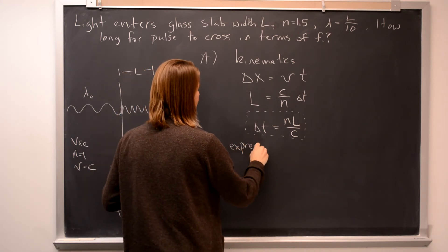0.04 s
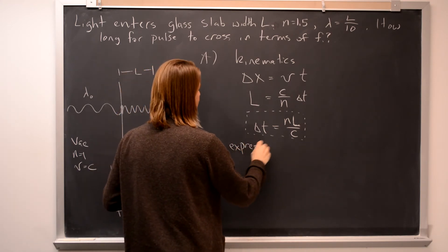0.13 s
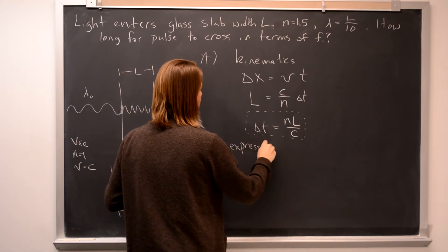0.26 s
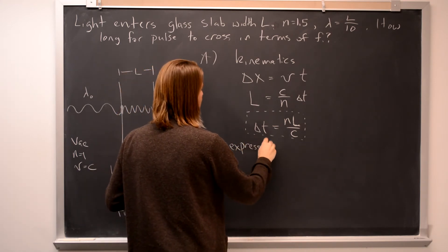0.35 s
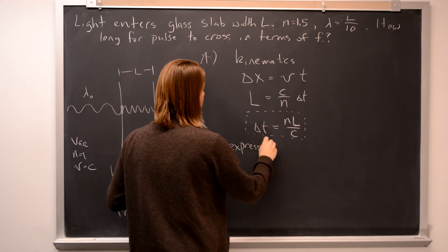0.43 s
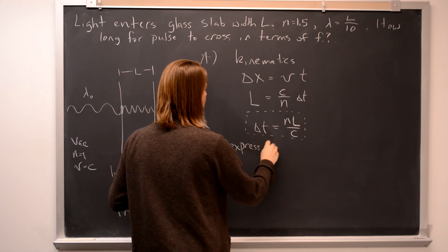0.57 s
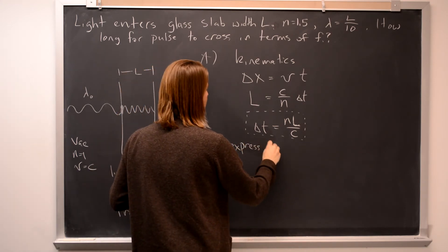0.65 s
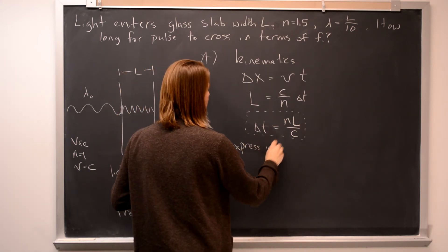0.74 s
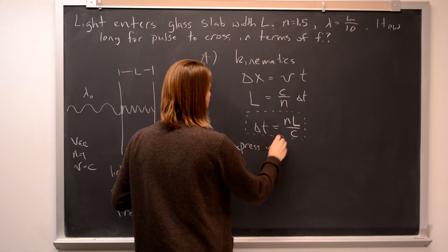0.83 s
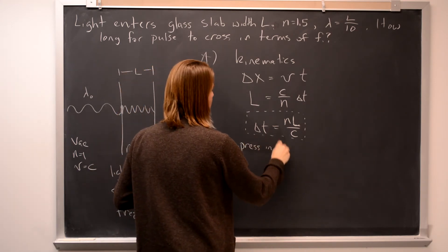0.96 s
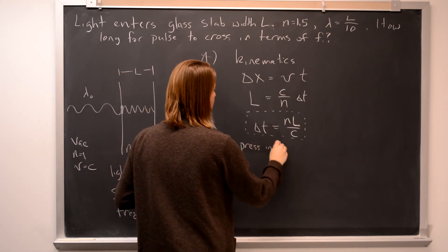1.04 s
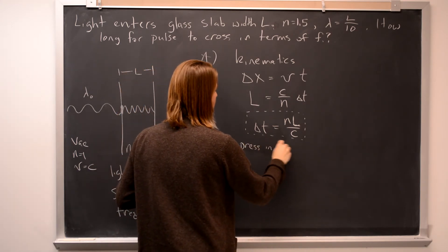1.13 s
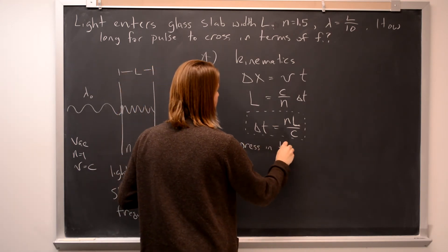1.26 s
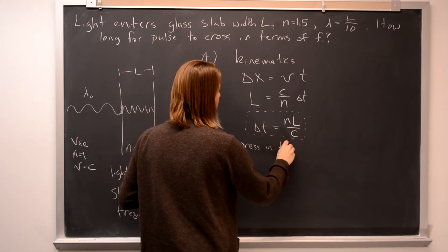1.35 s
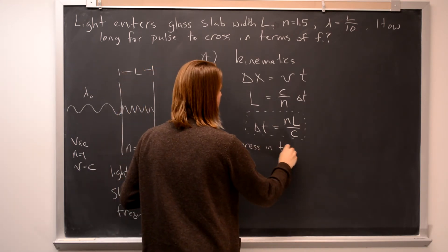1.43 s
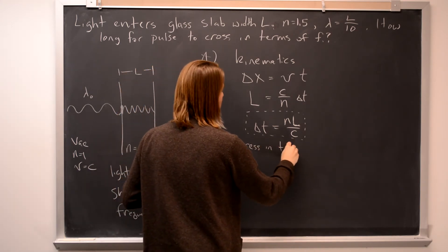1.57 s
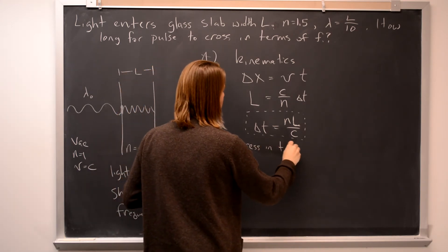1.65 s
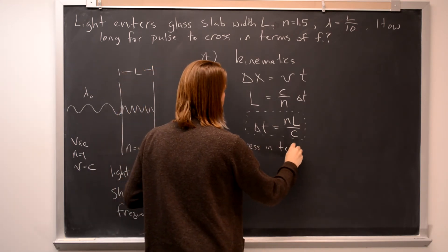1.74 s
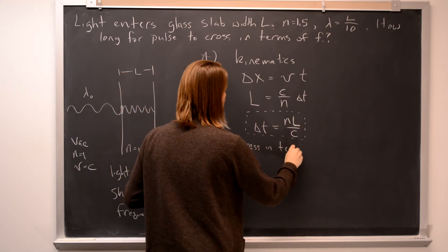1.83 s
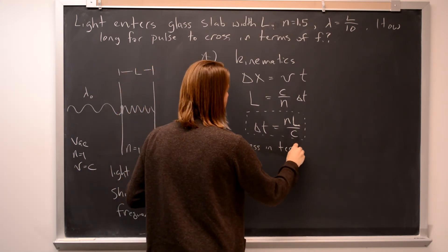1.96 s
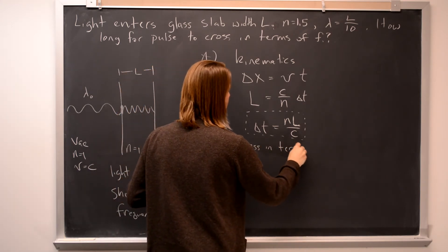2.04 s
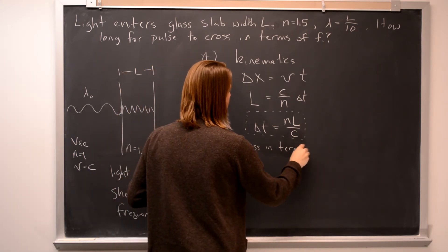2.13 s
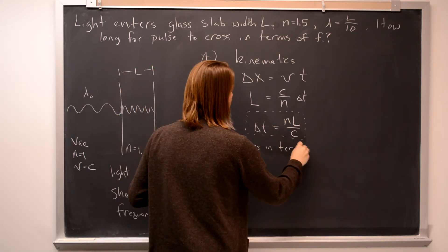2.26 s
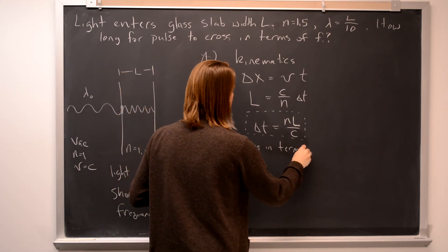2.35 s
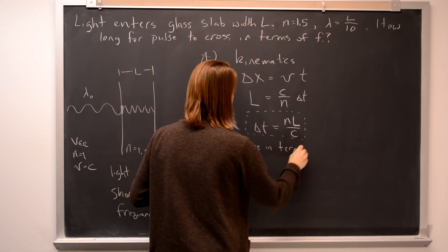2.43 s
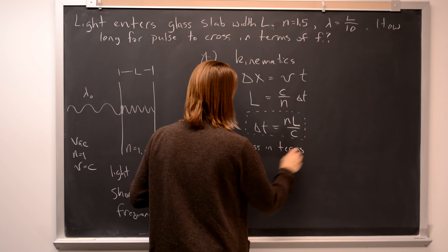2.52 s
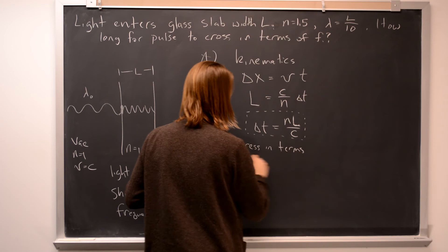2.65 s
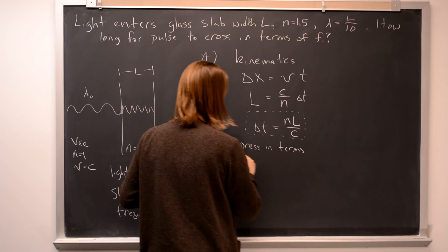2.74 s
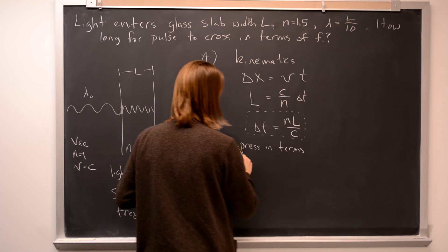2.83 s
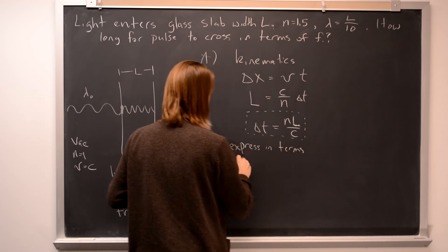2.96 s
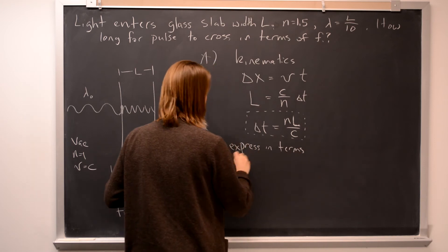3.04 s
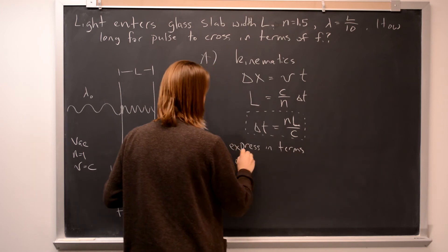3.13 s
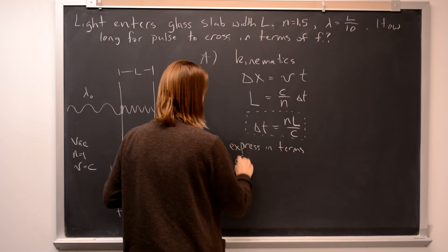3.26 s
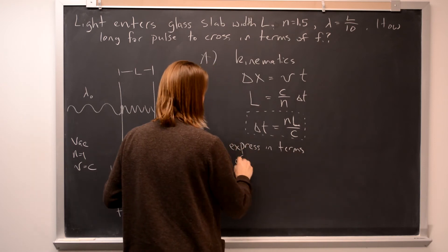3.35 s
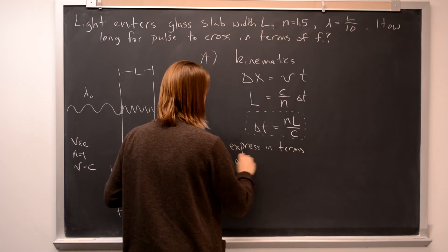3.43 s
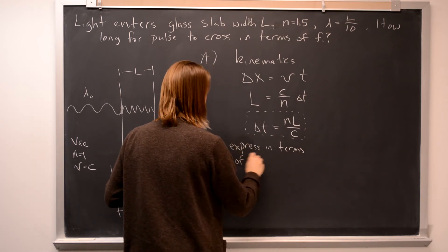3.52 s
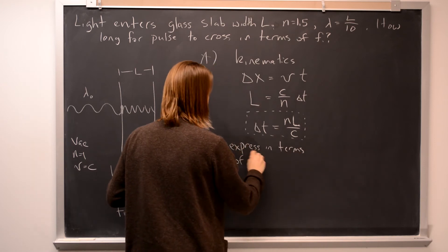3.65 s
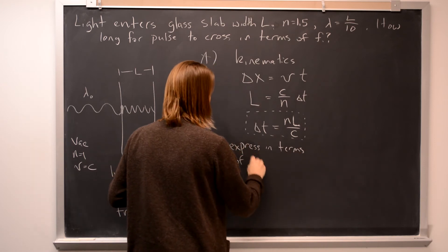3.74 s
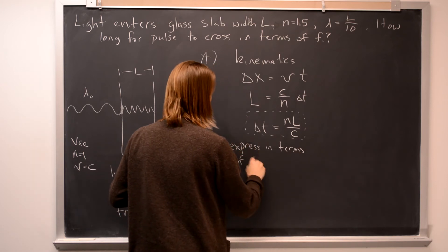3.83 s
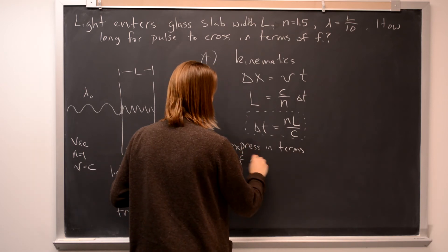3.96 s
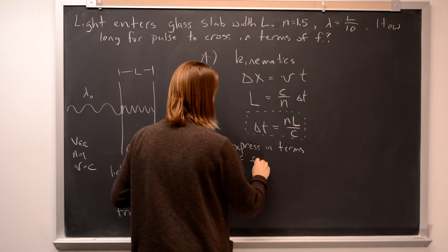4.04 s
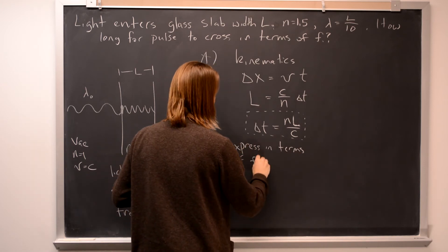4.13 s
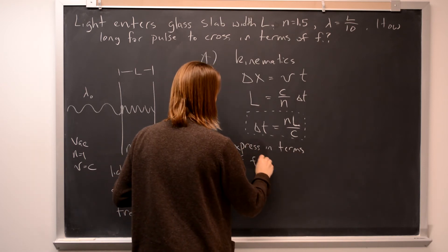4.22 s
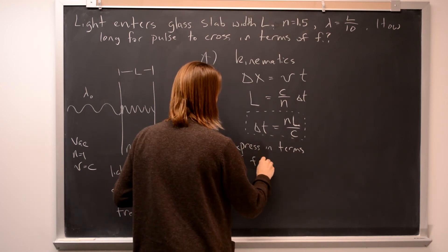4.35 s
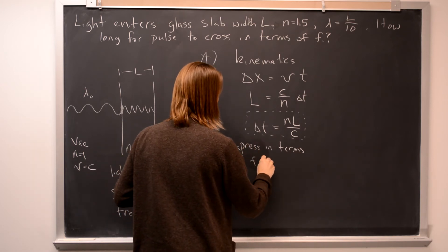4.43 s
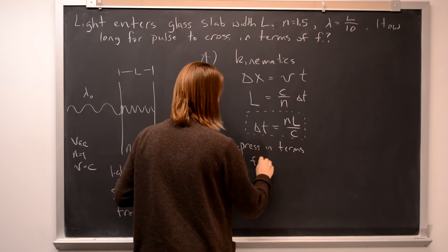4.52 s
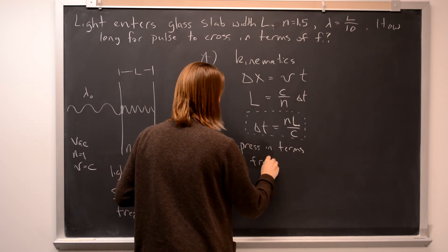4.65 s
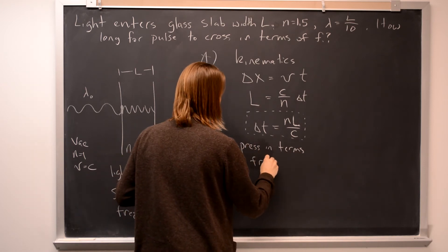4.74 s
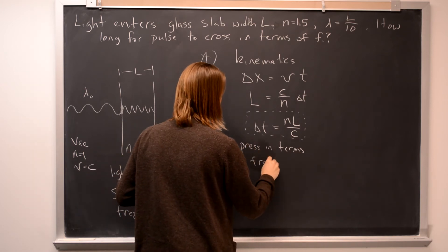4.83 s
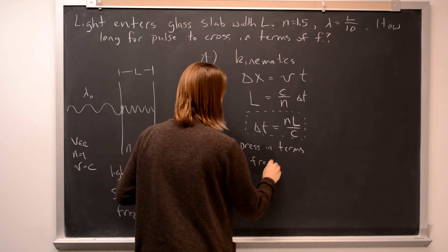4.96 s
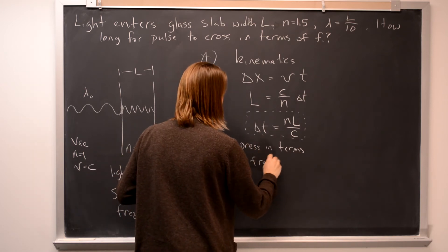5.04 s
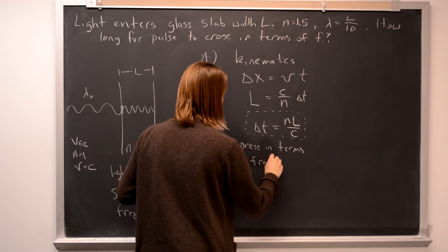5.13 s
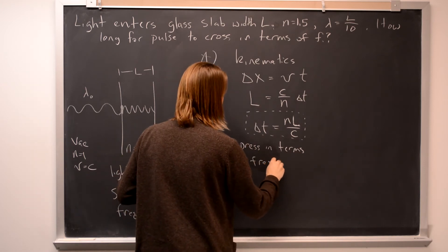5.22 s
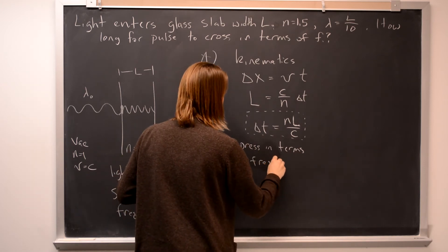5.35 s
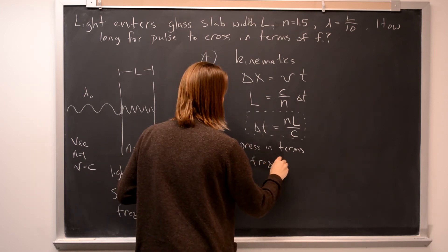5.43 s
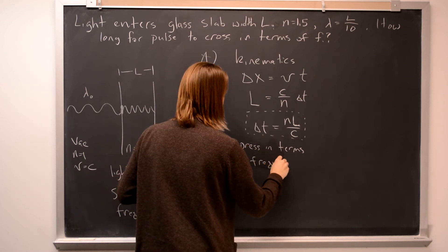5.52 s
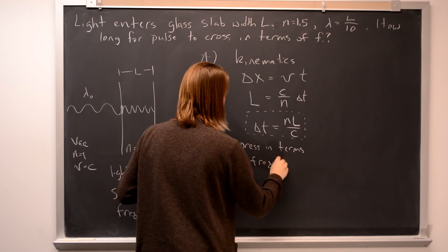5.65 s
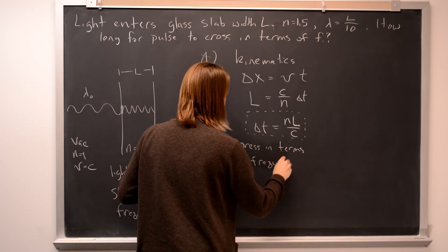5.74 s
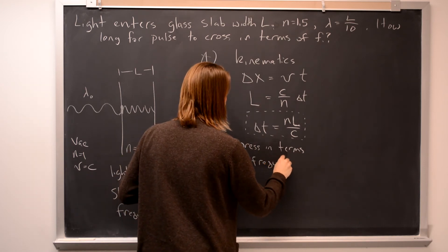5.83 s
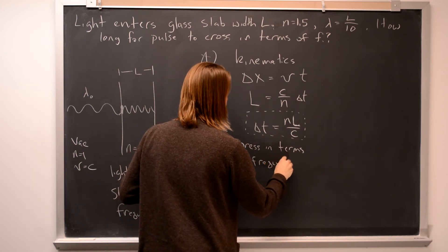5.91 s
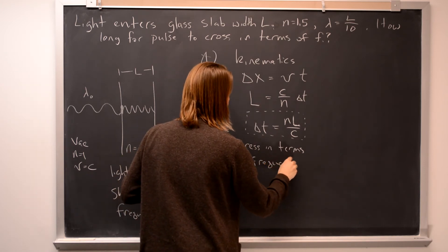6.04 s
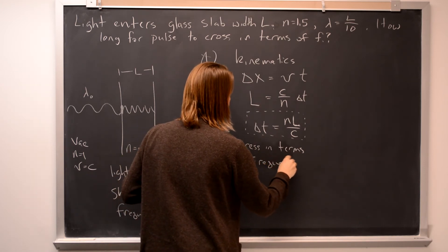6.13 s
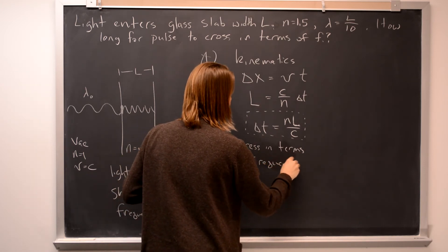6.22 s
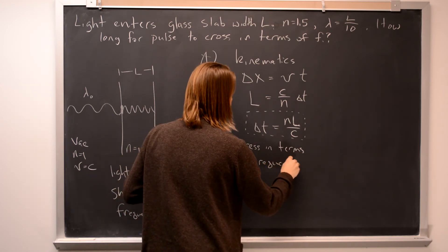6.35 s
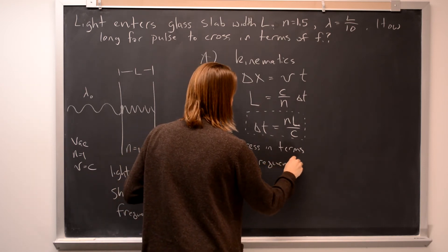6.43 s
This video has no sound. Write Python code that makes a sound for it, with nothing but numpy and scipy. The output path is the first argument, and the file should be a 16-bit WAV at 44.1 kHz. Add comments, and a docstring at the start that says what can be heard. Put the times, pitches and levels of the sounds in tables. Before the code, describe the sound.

A few metres from a stereo microphone, chalk strikes a wall blackboard in irregular handwriting rhythm. Each sharp knock rings briefly through the board and fades in a short classroom reverb. Strong taps come first, gaps and gentler touches follow, then duller, lower knocks and a final brisk group. The sliding between them is faint, with one tiny high squeak late. Steady soft air and hum lie underneath, with dull, nearly hidden thuds.

```python
"""Chalk writes on a wall blackboard in a small, quiet classroom, a few metres from a stereo microphone.
Each stroke starts with a hard tap: an impulse that excites the board's resonances, early echoes and room.
The chalk then slides faintly, as filtered friction noise, and squeaks twice, as gliding stick-slip tones.
Soft low thuds are short pressure pulses, each with a faint rustle of filtered noise just ahead.
Ventilation is shaped steady noise with a slightly wavering hum of sines."""
import sys
import numpy as np
from scipy import signal
from scipy.fft import rfft, irfft
from scipy.io import wavfile

SR = 44100
rng = np.random.default_rng(int(sys.argv[2]) if len(sys.argv) > 2 else 0)


def persist_wave(psi):
    """Save psi, clipped to +-1, as 16-bit WAV."""
    counts = np.round(np.clip(psi, -1, 1) * 32767).astype(np.int16)
    wavfile.write(sys.argv[1], SR, np.atleast_2d(counts).T)


N = 285856
TIME = np.arange(N) / SR
# samples in each short sound and room response, and their times in seconds
LENGTH = 16384
SHORT_TIME = np.arange(LENGTH) / SR
# signs of a difference between the left and right channels
LEFT_RIGHT = np.array([[1], [-1]])

# chalk landings: (time [s], relative level [dB], contact hardness [dB], board resonance at that spot [Hz])
LANDINGS = [(0.1982, -8, 0.5, 1754), (0.3424, -11.5, 5.5, 1975), (0.4768, -5.5, 2.5, 1790),
            (.869, -7.5, 4, 1640), (1.0676, -5.5, 5, 1234), (1.2289, -8, 0.5, 1603),
            (1.466, -13.5, 0, 1598), (1.6985, -19, -3, 1430), (2.185, -8, 5.5, 1774),
            (2.8362, -17, -5.5, 1617), (3.1342, -15, -7.5, 1558), (3.3717, -11, 4, 1586),
            (3.595, -10, 0, 1480), (3.8168, -16, -5.5, 873), (4.0188, -8.5, -1, 1060),
            (4.3094, -15, -6, 1041), (4.6491, -16.5, -5.5, 1060), (5.124, -7, 3.5, 1150),
            (5.249, -27.5, -5.5, 950), (5.4821, -8.5, -4, 1175), (5.7823, -6.5, 1, 1164),
            (6.1022, -8.5, 6.5, 1200), (6.2812, -10.5, 2.5, 1167)]
# broad colour of the board under an average tap: (frequency [Hz], relative level [dB])
BOARD_COLOUR = [(100, -28.5), (320, -28), (450, -16), (750, -10.5), (1100, -2), (1550, -1.5), (1900, -9),
                (2700, -3.5), (4000, -15.5), (4900, -22), (6800, -26), (10000, -41), (16000, -69)]
# soft low thuds: (time [s], relative level [dB])
THUD_EVENTS = [(.549, -39.5), (1.049, -41), (1.571, -40.5), (2.06, -43.5), (3.033, -47.5), (3.548, -40.5),
               (4.052, -37.5), (4.574, -43.5), (5.065, -42), (6.052, -42)]


def undb(db):
    """Amplitude ratio: 20 dB is a factor of ten."""
    return 10 ** (np.asarray(db) / 20)


def unit(x):
    """Normalisation to a root-mean-square value of 1."""
    return x / np.sqrt(np.mean(x ** 2))


def curve(points, hz):
    """Linear interpolation of (frequency [Hz], value) points on a logarithmic frequency axis."""
    f, value = np.transpose(points)
    return np.interp(np.log(hz + 1), np.log(f), value)


def bins(size):
    """Frequencies in Hz of a discrete Fourier spectrum."""
    return np.fft.rfftfreq(size, 1 / SR)


def resonance(hz, centre_hz, width_hz):
    """Lorentzian resonance peak of height 1, with its full width at half height."""
    return 1 / (1 + (2 * (hz - centre_hz) / width_hz) ** 2)


def causal(db):
    """Minimum-phase response with the given gain: it rings after a blow, never before."""
    cepstrum = irfft(np.log(undb(db)))
    half = len(cepstrum) // 2
    # folding the cepstrum onto positive times makes the response causal
    folded = np.r_[cepstrum[0], 2 * cepstrum[1:half], np.zeros(half)]
    return np.exp(rfft(folded))


def add(out, start_s, sound):
    """Superposition: a sound is summed into the mix from its start time."""
    i = max(int(start_s * SR), 0)
    out[:, i:i + sound.shape[1]] += sound[:, :N - i]


def taps(gain_db=19, room_db=2.5, spot_db=4.0, near_db=5, spot_width_hz=440, shared=0.38):
    """Impulse excitation: each landing rings the board's modes, most at the resonance of the struck spot."""
    # modes of the board: (frequency [Hz], width [Hz], height [dB])
    board_modes = [(675, 37, 4.5), (772, 19, 4), (963, 12, 5.5), (1168, 90, 4.5), (1326, 52, 6),
                   (1641, 91, -3), (1652, 94, 7), (2020, 126, 5), (2400, 25, -0.5), (2474, 35, 2),
                   (2720, 53, 1), (2850, 68, 3), (3140, 50, 3.5), (3590, 54, 0.5), (4100, 77, 6.5)]
    out, hz = np.zeros((2, N)), bins(LENGTH)
    board_db = curve(BOARD_COLOUR, hz)
    for mode_hz, width_hz, height_db in board_modes:
        board_db = board_db + height_db * resonance(hz, mode_hz, width_hz)
    common_field = diffuse(LENGTH)
    for start_s, level_db, hardness_db, spot_hz in LANDINGS:
        spot = resonance(hz, spot_hz, spot_width_hz)
        contact_db = touch(hz, level_db, hardness_db, spot_hz)
        ring = causal(board_db + contact_db + spot_db * spot)
        # the struck spot speaks first, before the blow spreads through the whole board
        first = irfft(ring * causal(near_db * spot) * arrivals())
        # all spots share part of their echo pattern
        field = np.sqrt(shared) * common_field + np.sqrt(1 - shared) * diffuse(LENGTH)
        room = irfft(ring * rfft(reverberation(field)))
        knock = unit(first) + undb(room_db) * unit(room)
        add(out, start_s, undb(level_db + gain_db) * knock / np.sqrt(LENGTH))
    return out


def touch(hz, level_db, hardness_db, spot_hz):
    """Contact stiffness sets the colour: a hard contact clacks, and a hard or strong one ticks."""
    # relative to an average landing at -11 dB and 1390 Hz
    # spots that resonate higher also give more low body: 6 dB per octave
    body_db = 6 * np.log2(spot_hz / 1390)
    tick_db = .75 * (level_db + 11) + 1.33 * hardness_db
    return curve([(600, body_db), (1300, 0), (2700, hardness_db), (6000, tick_db)], hz)


def arrivals(jitter_s=.00016, scatter_db=3.06, channel_lag_s=.000011, treble_hz=5500,
             crush_db=-3, crush_s=0.001):
    """Multipath propagation: delayed copies interfere, and their paths shift as the hand moves."""
    # first arrivals, past the writer and off nearby surfaces:
    # (mean delay [s], mean level [dB], added treble [dB])
    paths = [(.0004, -7.5, 5), (.0019, -5.5, 6.5), (.0044, 2, 10), (.0055, -6, 31), (.0075, -11, 11),
             (0.0093, -12.5, 15), (0.0222, -11.5, -16)]
    hz, total = bins(LENGTH), 0
    treble = hz ** 2 / (hz ** 2 + treble_hz ** 2)
    shifts = rng.standard_normal((len(paths), 3))
    for (delay_s, level_db, treble_db), (late, size, angle) in zip(paths, shifts):
        lag_s = max(delay_s + jitter_s * late, 0) + channel_lag_s * angle * LEFT_RIGHT
        gain = undb(level_db + scatter_db * size + treble_db * treble)
        total = total + gain * np.exp(-2j * np.pi * hz * lag_s)
    # the tip crumbles for a moment as it lands, which smears the treble
    crumbs = rng.standard_normal(LENGTH) * np.exp(-SHORT_TIME / crush_s)
    crumbs = unit(crumbs) / np.sqrt(LENGTH)
    return total * (1 - treble + undb(crush_db) * treble * rfft(crumbs))


def slides(graze_db=-52, graze_s=0.008, slide_db=-39, slide_s=0.11):
    """Contact noise: the tip grazes the board around each landing and slides after it; short scrapes join in."""
    # short scrapes, and at 5.262 s the soft noise of a second light tap:
    # (time [s], length [s], direct level [dB], centre frequency [Hz])
    short_noises = [(0.0, 0.0073, -46.5, 1450), (3.49, 0.011, -61.5, 1410), (3.885, 0.025, -50, 1050),
                    (5.262, .018, -36, 967)]
    out = np.zeros((1, N))
    noises = list(short_noises)
    for start_s, level_db, _, spot_hz in LANDINGS:
        noises.append((start_s - graze_s, 2 * graze_s, graze_db, spot_hz))
        # the slide's level is relative to its tap's
        noises.append((start_s, slide_s, level_db + slide_db, spot_hz))
    for start_s, length_s, level_db, centre_hz in noises:
        arch = np.sin(np.pi * np.minimum(SHORT_TIME / length_s, 1))
        pressure = np.sqrt(np.clip(arch, 0, 1))
        add(out, start_s, undb(level_db) * friction(pressure, centre_hz)[None])
    return out


def friction(pressure, centre_hz, width_hz=550, grain_db=4, focus_db=15, soft_hz=3200):
    """Random excitation: chalk crumbling under a soft push gives dense uneven grains that ring the board."""
    hz = bins(LENGTH)
    unevenness = undb(grain_db * rng.standard_normal(LENGTH))
    grains = pressure * rng.standard_normal(LENGTH) * unevenness
    board = causal(curve(BOARD_COLOUR, hz) + focus_db * resonance(hz, centre_hz, width_hz))
    # the soft push is a first-order low-pass
    scrape = irfft(rfft(grains) * board / (1 + 1j * hz / soft_hz))
    return unit(scrape) * np.sqrt(np.mean(pressure ** 2))


def squeaks(overtone_db=-38, tone_attack=.5, rasp_attack=.25):
    """Stick-slip oscillation: a tone swells, glides and lets go; it rasps as the tip catches."""
    # squeaks: (time [s], length [s], direct level [dB], starting pitch [Hz], glide [Hz/s],
    # rasp relative to the tone [dB])
    squeak_events = [(2.952, .036, -40, 1780, -10000, -3.5), (5.849, .023, -13, 2222, 2800.5, -33.5)]
    out = np.zeros((1, N))
    for start_s, length_s, level_db, pitch_hz, glide, rasp_db in squeak_events:
        pitch = pitch_hz + glide * np.minimum(SHORT_TIME, length_s)
        phase = 2 * np.pi * np.cumsum(pitch) / SR
        # each attack is a share of the squeak's length
        progress = SHORT_TIME / length_s
        swell = np.interp(progress, [0, tone_attack, 1], [0, 1, 0])
        catch = np.interp(progress, [0, rasp_attack, 1], [0, 1, 0]) ** 2
        tone = swell * (np.sin(phase) + undb(overtone_db) * np.sin(2 * phase))
        rasp = undb(rasp_db) * friction(catch, pitch_hz)
        add(out, start_s, undb(level_db) * (tone + rasp)[None])
    return out


def diffuse(size):
    """Diffuse field: the spectrum of white noise that reaches the microphone from all sides."""
    # side against mid: (frequency [Hz], level difference [dB])
    side_levels = [(40, -11), (150, -7), (500, -7), (1100, -8.5), (3000, -6.5), (8000, -3), (14000, -3.5)]
    mid, side = rfft(rng.standard_normal((2, size)))
    width = undb(curve(side_levels, bins(size)))
    return (mid + width * side * LEFT_RIGHT) / np.sqrt(1 + width ** 2)


def reverberation(field, build_s=0.0051):
    """Exponential decay: each band of a diffuse field dies at its own rate, in a response of unit energy."""
    # decay of board and room: (frequency [Hz], time to fall by 60 dB [s])
    decays = [(200, 0.33), (550, 0.27), (1100, 0.25), (1450, 0.26), (2000, 0.24), (2600, 0.25),
              (3100, 0.25), (3800, .23), (5500, 0.22), (10000, 0.13)]
    hz = bins(LENGTH)
    centres, t60s = np.transpose(decays)
    tail = 0
    for share, t60 in zip(np.eye(len(decays)), t60s):
        band = irfft(field * curve(np.c_[centres, share], hz))
        tail = tail + band * np.exp(-np.log(1000) * SHORT_TIME / t60)
    build_up = 1 - np.exp(-SHORT_TIME / build_s)
    return unit(tail * build_up) / np.sqrt(LENGTH)


def in_room(x, wet_db):
    """Convolution with the room response adds the classroom's reverberation to a sound."""
    response = reverberation(diffuse(LENGTH), build_s=0.0035)
    wet = signal.fftconvolve(x, response, axes=1)[:, :N]
    return x + undb(wet_db) * np.std(x) * unit(wet)


def thuds(width_s=0.0054, lead_s=0.0297, lead_db=-3):
    """Pressure pulses: each thud is a dull dip of pressure followed by a push."""
    def bump(centre_s):
        u = (TIME - centre_s) / width_s
        return np.exp(-u ** 2) - np.exp(-(u / 4) ** 2) / 4

    out = np.zeros(N)
    for push_s, level_db in THUD_EVENTS:
        dip = undb(lead_db) * bump(push_s - lead_s)
        out += undb(level_db) * (bump(push_s) - dip)
    return out


def rustles(rustle_db=-65, ahead_s=0.032, length_s=.014, centre_hz=1320):
    """Gated friction noise: a faint rustle comes just ahead of each thud."""
    out = np.zeros((1, N))
    pressure = 1. * (SHORT_TIME < length_s)
    for thud_s, _ in THUD_EVENTS:
        add(out, thud_s - ahead_s, undb(rustle_db) * friction(pressure, centre_hz)[None])
    return out


def ventilation(air_db=-55.5, waver_rad=.6):
    """Broadband flow noise with a tonal hum whose phases drift slowly at random."""
    # spectrum of ventilation and hiss: (frequency [Hz], relative density [dB per Hz])
    air_colour = [(15, -57.5), (25, -17.5), (108, -4.5), (161, -7), (206, -6.5), (242, -3), (270, -8.5),
                  (309, -9.5), (476, -15), (714, -15), (1160, -19), (4870, -23.5), (11300, -23.5),
                  (16000, -25)]
    # hum partials: (frequency [Hz], rms level [dB])
    hum_partials = [(60, -70), (120.5, -68.5), (239, -83)]
    air = irfft(diffuse(N) * undb(curve(air_colour, bins(N))), N)
    air = unit(air) * undb(air_db)
    knots = np.linspace(0, TIME[-1], 20)
    hum = 0
    for hz, level_db in hum_partials:
        drift = waver_rad * np.interp(TIME, knots, rng.standard_normal(len(knots)))
        hum = hum + undb(level_db) * np.sqrt(2) * np.sin(2 * np.pi * hz * TIME + drift)
    return air + hum


def scene(left_db=1.0, wet_db=-3):
    """Superposition of the writing and the background, a touch left of centre, with central thuds."""
    faint = slides() + squeaks() + rustles()
    chalk = taps() + in_room(faint, wet_db)
    balance = undb(left_db * LEFT_RIGHT / 2)
    return (chalk + ventilation()) * balance + thuds()


def record(dry):
    """Saturation and band-limiting: the recorder rounds the highest peaks and cuts the top."""
    ceiling, top_hz = .88, 16100
    rounded = dry / (1 + (dry / ceiling) ** 4) ** (1 / 4)
    # order 10, 0.2 dB ripple, 70 dB rejection
    low_pass = signal.ellip(10, .2, 70, top_hz, fs=SR, output="sos")
    return signal.sosfilt(low_pass, rounded)


dry = scene()
out = record(dry)
persist_wave(out)
```